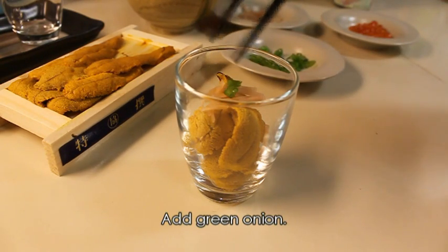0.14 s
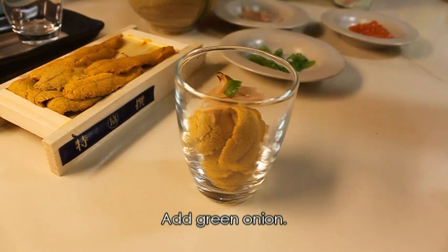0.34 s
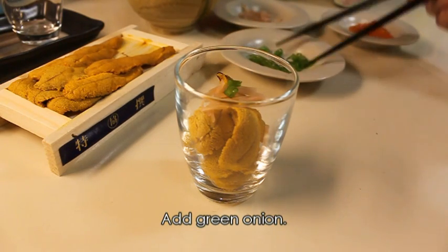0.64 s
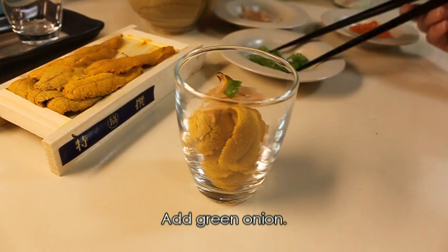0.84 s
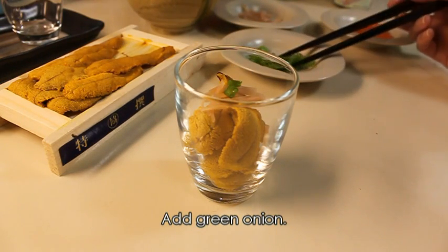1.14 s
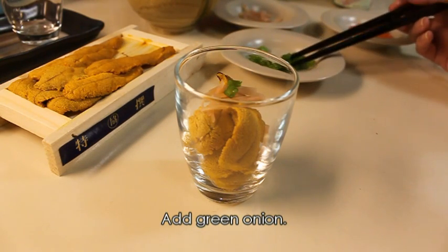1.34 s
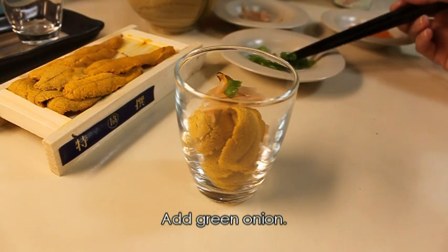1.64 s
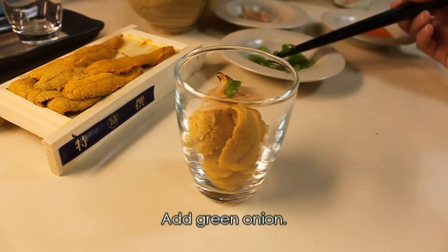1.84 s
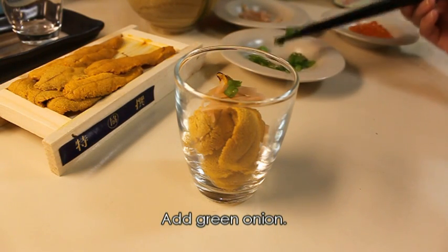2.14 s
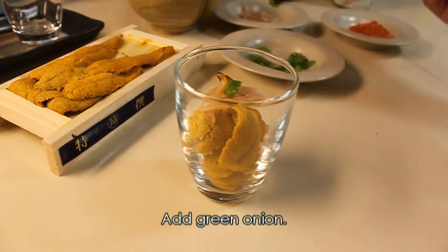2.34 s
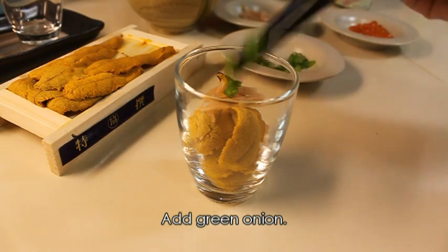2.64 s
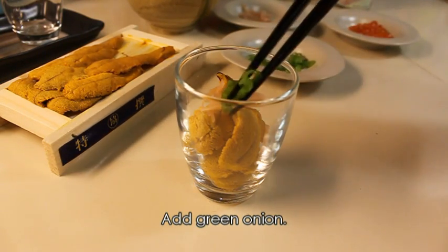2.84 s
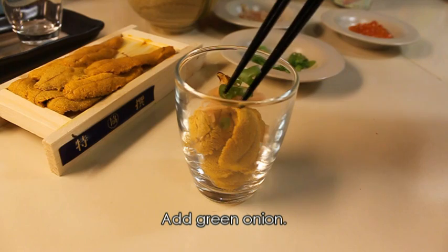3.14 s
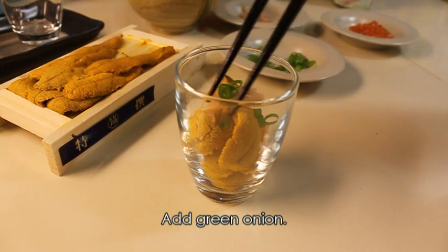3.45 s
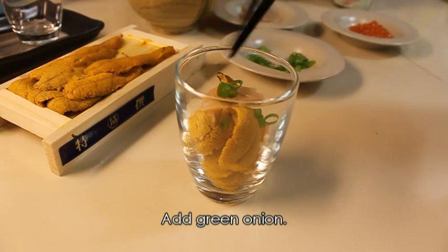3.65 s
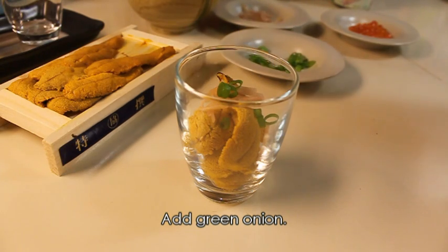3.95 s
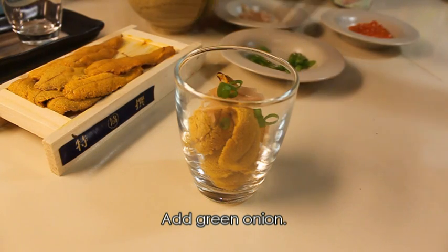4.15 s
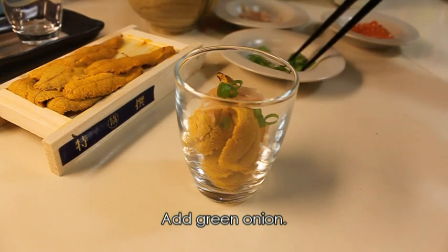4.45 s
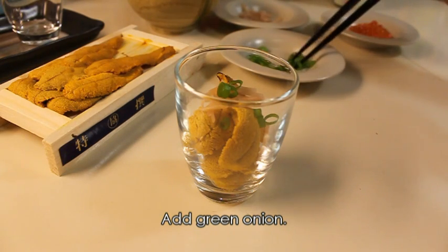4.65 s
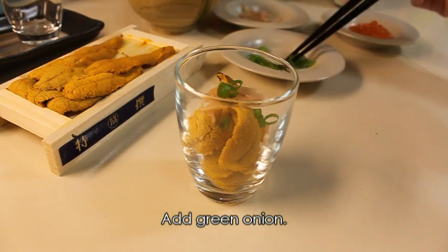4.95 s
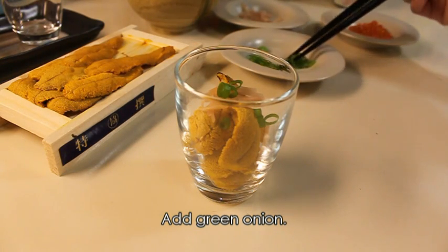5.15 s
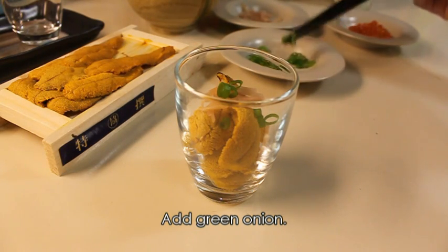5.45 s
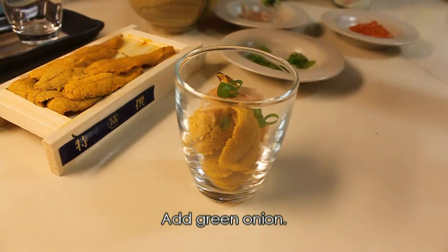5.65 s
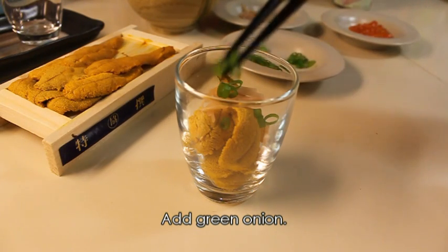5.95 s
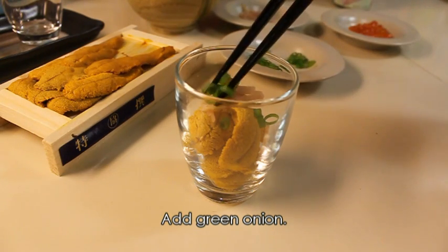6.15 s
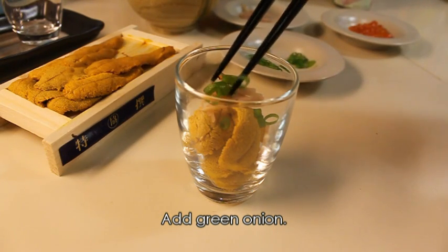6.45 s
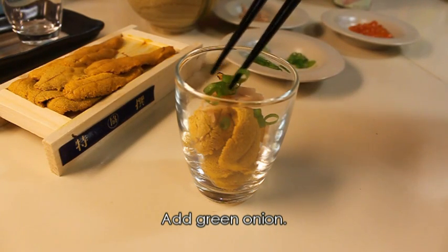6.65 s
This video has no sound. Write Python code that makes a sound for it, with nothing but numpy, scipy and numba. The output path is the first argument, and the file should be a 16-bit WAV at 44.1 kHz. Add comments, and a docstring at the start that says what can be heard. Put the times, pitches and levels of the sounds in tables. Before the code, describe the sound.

A refrigerator hums steadily with a thin high whine in a hard-walled kitchen. Close to the microphone, chopsticks click lightly on a small ceramic plate and scrape softly through chopped green onion. They tick once against a glass, then tap the plate more firmly. Further off, a dish is set down and crockery clashes loudly with a quick rattle, after which the hum dips and creeps back.

```python
"""Chopsticks in a kitchen

A refrigerator hums and whines in a hard-walled kitchen; further off, crockery is set down, then clashes
and rattles. Nearby, chopsticks pick green onion off a small ceramic plate, tap the plate and tick against
a glass. Each impact gives a brief click and excites the damped modes of the vessel struck.
An automatic gain control ducks after the clash and creeps back."""
import sys
import numpy as np
from scipy import signal
from scipy.fft import rfft, irfft, next_fast_len
from scipy.io import wavfile
from scipy.ndimage import uniform_filter1d, map_coordinates
from numba import njit

SR = 44100
rng = np.random.default_rng(int(sys.argv[2]) if len(sys.argv) > 2 else 0)


def transcribe(signal):
    """Save signal, clipped to [-1, 1], as a 16-bit WAV file at the path in sys.argv[1]."""
    frames = np.atleast_2d(signal).T
    limited = np.clip(frames, -1, 1)
    pcm = np.round(limited * 32767).astype(np.int16)
    wavfile.write(sys.argv[1], SR, pcm)


N = 299439

# chopstick taps on the plate: t/s, relative level/dB, relative push on the counter/dB, pitch ratio
PLATE_TAPS = [(.865, -25.5, -29, 1.05), (1.0096, -27, -27, .93), (1.191, -39, -38, 0.97),
              (4.4197, -18, -18.5, 0.99), (4.484, -32.5, -38, 1), (4.5734, -18.5, -19, 1.03)]


def amp(db):
    """Amplitude ratio of a level in decibels."""
    return 10 ** (np.asarray(db) / 20)


def unit(x):
    """Normalisation to an rms of 1."""
    return x / np.sqrt(np.mean(x ** 2) + 1e-20)


def along(points, hz):
    """Interpolation of (f/Hz, value) points on a logarithmic frequency axis."""
    f, v = np.transpose(points)
    return np.interp(np.log(hz + 1), np.log(f + 1), v)


def wobble(rate):
    """Random modulation: a smooth curve through `rate` Gaussian values a second."""
    knots = rng.standard_normal(int(N * rate / SR) + 4)
    return map_coordinates(knots, [np.arange(N) * rate / SR])


def filtered(x, response):
    """Linear filtering: the spectrum of x times a frequency response."""
    size = next_fast_len(len(x) + SR // 10)
    return irfft(rfft(x, size) * response(np.fft.rfftfreq(size, 1 / SR)), size)[:len(x)]


def shaped(x, spectrum):
    """Spectral shaping of x by (f/Hz, level/dB) points, at unit rms."""
    return unit(filtered(x, lambda f: amp(along(spectrum, f))))


def add(track, s, sound):
    """Superposition of a sound on the track at s seconds."""
    part = track[round(s * SR):][:len(sound)]
    part += sound[:len(part)]


def ring(modes, t, scatter_db):
    """Free vibration: exponentially damped modes, with new strengths and phases at each blow."""
    return sum(amp(db + scatter_db * rng.normal() - 60 * t / t60)
               * np.sin(2 * np.pi * (hz * t + rng.random())) for hz, db, t60 in modes)


def room(x, wet_db):
    """Reverberation: direct sound plus the kitchen's diffuse tail, whose top treble dies first."""
    # reverberation time: f/Hz, T60/s
    decay_times = [(300, 0.23), (1500, 0.44), (4000, 0.32), (8000, 0.33), (15000, 0.2)]
    hz, t, spectra = signal.stft(rng.standard_normal(SR // 2), SR, nperseg=256)
    decay = amp(-60 * t / along(decay_times, hz)[:, None])
    tail = signal.istft(spectra * decay, SR, nperseg=256)[1]
    return x + amp(wet_db) * signal.fftconvolve(x, tail / np.linalg.norm(tail))[:len(x)]


def refrigerator_hum(shaft_hz=58.57, buzz_hz=119.97, buzz_db=-60.5, waver_db=1.16, drift_rad=0.21):
    """Forced vibration: the shaft slips just behind the mains; the iron buzzes at twice the mains rate."""
    # compressor tones: multiple of the shaft rate, level/dB
    shaft_orders = [(1, -59), (6, -43), (7, -54), (8, -62)]
    # fan tones, the lowest two beating: f/Hz, level/dB
    fan_tones = [(445.6, -63), (449.3, -59), (772.5, -66), (940.7, -63)]
    shaft = [(order * shaft_hz, db) for order, db in shaft_orders]
    overtones = [(k * buzz_hz, buzz_db - 6.5 * np.log2(k / 6)) for k in range(6, 14)]  # -6.5 dB/octave
    hum, t = np.zeros(N), np.arange(N) / SR
    for hz, db in shaft + [(buzz_hz, buzz_db)] + overtones + fan_tones:
        amplitude = np.sqrt(2) * amp(db + waver_db * wobble(5.5))
        phase = 2 * np.pi * (hz * t + rng.random()) + drift_rad * wobble(1.8)
        hum += amplitude * np.sin(phase)
    return hum


def refrigerator_air(level_db=-46):
    """Broadband flow noise: air moved by the fan."""
    # spectrum of the air: f/Hz, relative level/dB
    spectrum = [(20, -17), (40, -9), (80, -8), (110, -1), (195, -0.5), (250, -4), (330, 3.5), (550, 0.5),
                (950, -4), (2000, -11), (3500, -14), (5500, -19), (10000, -27), (15800, -29)]
    return amp(level_db) * shaped(rng.standard_normal(N), spectrum)


def refrigerator_whine(waver_db=0.5):
    """Narrow-band noise: the machine whines in thin bands, each wavering in level."""
    # bands of whine: f/Hz, half-width/Hz, level/dB
    bands = [(2768, 17, -67), (3630, 150, -62.5), (4400, 10, -74), (4776, 5.5, -70), (6007, 44, -66.5),
             (6430, 4.5, -68), (8145, 170, -66.5), (9190, 49, -71), (9520, 40, -73.5), (10580, 60, -78),
             (11930, 120, -73.5)]
    whine = np.zeros(N)
    for hz, width, db in bands:
        band = filtered(rng.standard_normal(N), lambda f: 1 / (1 + ((f - hz) / width) ** 2))
        whine += unit(band) * amp(db + waver_db * wobble(2.84))
    return whine


def crockery(contacts, modes, spectrum, level_db, ring_db, crack_t60, rise_s, wet_db):
    """Impacts in the reverberant field: each cracks and rings the dishes, low-passed at its own cut-off."""
    out, t = np.zeros(N), np.arange(SR * 2 // 3) / SR
    for s, db, cutoff_hz in contacts:
        crack = shaped(rng.standard_normal(len(t)), spectrum) * amp(-60 * t / crack_t60)
        tone = amp(ring_db) * ring(modes, t, scatter_db=4.0)
        hit = (crack + tone) * (1 - np.exp(-t / rise_s))
        hit = filtered(hit, lambda f: 1 / (1 + .5j * f / cutoff_hz) ** 2)
        add(out, s, amp(db + level_db) * room(hit, wet_db))
    return out


def dish_set_down():
    """Damped impact: a dish meets a counter across the room, thuds and rings briefly."""
    # contacts: t/s, relative level/dB, cut-off f/Hz
    knocks = [(5.367, -22, 9000), (5.373, -13.5, 7000), (5.385, -16.5, 3500), (5.407, -16.5, 5000),
              (5.482, -21, 7000), (5.503, -23.5, 2200)]
    # modes of the dish: f/Hz, relative level/dB, T60/s
    modes = [(1104, -3, .15), (1414, -2, 0.13), (1454, -2, 0.11), (1700, -15, .2), (2810, 5.5, 0.073),
             (3510, 4.5, 0.11), (3820, 1, 0.11), (6400, -8, .15), (7300, -3, 0.14)]
    # spectrum of dish against counter: f/Hz, relative level/dB
    thud_spectrum = [(150, -33), (350, -3), (600, -9), (850, -1), (1150, -0.5), (2100, -1), (3000, -3),
                     (4200, -1.5), (5200, -5), (7200, -7.5), (8500, -14), (15800, -14)]
    return crockery(knocks, modes, thud_spectrum, level_db=-4, ring_db=-22.5,
                    crack_t60=0.042, rise_s=0.002, wet_db=3.0)


def crockery_clash(graze_lead_s=0.003, graze_db=-10.5, flight_s=0.0145, restitution=0.9, loss_db=2.5):
    """Inelastic bouncing: after a graze, each clash rattles on in ever quicker, weaker contacts."""
    # clashes: t/s, relative level/dB, cut-off f/Hz
    clashes = [(5.659, -1.5, 15500), (5.723, -6, 15500)]
    # modes of the crockery: f/Hz, relative level/dB, T60/s
    modes = [(845, -9, .25), (1105, -7, .2), (1395, -8, .2), (1493, -8, .2), (1738, -8, .25),
             (2812, -3, .22), (2862, -3, .22), (2962, -1, .3), (3514, -4, .2), (3752, 1, .25),
             (3869, -2, .2), (3932, -1, .25), (4084, -2, .2), (4122, 0, .3), (4322, -2, .3), (4673, -2, .2),
             (4803, 1, .28), (5428, -2, .3), (6433, -9, .25), (6631, -6, .3), (6945, -3, .25),
             (8273, -8, .25), (8958, -8, .22), (11250, -7, .22), (12260, -7, .22), (12910, -8, .2)]
    # spectrum of the contact: f/Hz, relative level/dB
    crack_spectrum = [(200, -28), (500, -14), (850, -5.5), (1500, -8), (2100, -4), (3000, 0.5), (4000, 2),
                      (5200, 3), (6000, -2.5), (7200, -3), (10000, -6), (12700, -1.5), (15800, -11)]
    first_s, first_db, first_hz = clashes[0]
    graze = [(first_s - graze_lead_s, first_db + graze_db, first_hz)]
    delays = np.append(0, np.cumsum(flight_s * restitution ** np.arange(3)))
    rattle = [(s + delay, db - loss_db * k, hz) for s, db, hz in clashes for k, delay in enumerate(delays)]
    return crockery(graze + rattle, modes, crack_spectrum, level_db=-1.5, ring_db=-32.0,
                    crack_t60=0.028, rise_s=0.0018, wet_db=4.5)


def onion(stir_db=-59, half_length_s=0.044, grain_db=1.5):
    """Friction noise: short, grainy scrapes as the tips gather the onion, with a few faint stirs."""
    # pushes through the onion: t/s, level/dB
    pushes = [(0.848, -46.5), (0.922, -47), (1.195, -52), (3.434, -50.5), (3.584, -53), (4.575, -50),
              (4.876, -54), (6.285, -52)]
    # spans of rummaging on the plate: start t/s, end t/s
    rummages = [(0.6, 1.27), (4.2, 4.4)]
    # spectrum of the scrape: f/Hz, relative level/dB
    spectrum = [(400, -20), (1100, 4), (3000, 3), (8000, -3), (15000, -10)]
    t = np.arange(N) / SR
    stirs = [(s, stir_db) for start, end in rummages for s in rng.uniform(start, end, size=2)]
    strokes = [amp(db) * np.exp(-2 * ((t - s) / half_length_s) ** 2) for s, db in pushes + stirs]
    envelope = np.sqrt(sum(stroke ** 2 for stroke in strokes))  # incoherent sounds add in power
    grains = rng.standard_normal(N) * amp(grain_db * wobble(500))
    return envelope * shaped(grains, spectrum)


def counter(level_db=-18, t60=0.15, rise_s=0.00099):
    """Force transmission: each tap pushes the plate against the counter, giving a short, dull knock."""
    # spectrum of the knock: f/Hz, relative level/dB
    spectrum = [(80, -20), (200, 1), (350, -18), (650, -2), (900, 6), (1150, 4.5), (1500, -22), (2300, -5),
                (5000, -26)]
    out, t = np.zeros(N), np.arange(SR // 4) / SR
    for s, _, db, _ in PLATE_TAPS:
        envelope = amp(db + level_db - 60 * t / t60) * (1 - np.exp(-t / rise_s))
        add(out, s, envelope * shaped(rng.standard_normal(len(t)), spectrum))
    return out


def chopsticks(contacts, modes, level_db, snap_db, click_db, click_t60, scatter_db, scatter_t60, wet_db):
    """Impulse excitation: a hard tip snaps and rings a vessel; nearby surfaces scatter the click."""
    out, t = np.zeros(N), np.arange(SR // 3) / SR
    tip_band = signal.butter(2, [1000, 13500], "band", fs=SR, output="sos")
    for s, db, tilt_db_per_octave, pitch in contacts:
        envelope = amp(click_db - 60 * t / click_t60) + amp(scatter_db - 60 * t / scatter_t60)
        click = envelope * rng.standard_normal(len(t))
        add(click, 0, [amp(snap_db)])  # the instant of contact
        add(click, 0.0029, [amp(snap_db - 9)])  # its first reflection
        tone = ring(modes, pitch * t, scatter_db=1.5)  # the pitch shifts with grip and point of contact
        hit = tone + signal.sosfilt(tip_band, click)
        hit = filtered(hit, lambda f: amp(tilt_db_per_octave * np.log2((f + 500) / 6000)))
        add(out, s, amp(db + level_db) * room(hit, wet_db))
    return out


def glass_tick(start_s=3.624, tick_db=-24.5, tilt_db_per_octave=-3, bounce_s=0.017, loss_db=8):
    """Impact and rebound: a chopstick ticks against the filled glass and bounces once."""
    # modes of the glass: f/Hz, relative level/dB, T60/s
    modes = [(1660, -11, 0.045), (4470, -2, 0.029), (4650, 1, 0.027), (6745, -3, 0.041), (7000, -6, .035),
             (8800, -6, 0.027), (10680, -8, .02)]
    contacts = [(start_s + k * bounce_s, tick_db - k * loss_db, tilt_db_per_octave, 1) for k in range(2)]
    return chopsticks(contacts, modes, level_db=-10, snap_db=6, click_db=-5, click_t60=0.0045,
                      scatter_db=-12, scatter_t60=0.04, wet_db=-14)


def glaze_slips(slip_s=0.0038, jitter=0.15, fade_db=12):
    """Stick-slip friction: skidding tips give uneven, fading blows (t/s, level/dB, pitch ratio)."""
    # skids over the glaze: t/s, duration/s, relative level of the first slip/dB, pitch ratio
    skids = [(0.835, .018, -30.5, 1.1), (4.545, 0.02, -27.5, 1)]
    slips = []
    for s, length, db, pitch in skids:
        gaps = slip_s * np.exp(jitter * rng.standard_normal(size=12))
        slips += [(s + t, db - fade_db * t / length, pitch) for t in np.cumsum(gaps) - gaps[0] if t < length]
    return slips


def plate_clicks(rebound_s=0.0075, loss_db=11, firm_db=-17):
    """Modal ringing: skids and taps, each tap rebounding once, excite the plate; light ones sound thin."""
    # modes of plate and stick: f/Hz, relative level/dB, T60/s
    modes = [(1094, 3, 0.065), (2235, -0.5, 0.05), (2523, 4.5, 0.045), (3900, 3.5, 0.051),
             (5060, -5, 0.047), (5320, -8, .035), (5870, -2, 0.086), (6800, -2, 0.052), (7700, 2, 0.038),
             (8500, -6, 0.032), (9600, -2, .035), (10260, -4, .04), (12200, -14, 0.032), (13300, -17, .035)]
    taps = [(s + k * rebound_s, db - k * loss_db, pitch) for s, db, _, pitch in PLATE_TAPS for k in range(2)]
    # a firm tap tilts up by 1.1 dB/octave; each decibel lighter adds 0.13 dB/octave
    contacts = [(s, db, 1.1 + 0.13 * (firm_db - db), pitch) for s, db, pitch in taps + glaze_slips()]
    return chopsticks(contacts, modes, level_db=-20, snap_db=22, click_db=11, click_t60=0.0054,
                      scatter_db=0.5, scatter_t60=0.094, wet_db=-12)


def scene():
    """Superposition: all sources add in one channel."""
    impacts = plate_clicks() + glass_tick() + dish_set_down() + crockery_clash()
    refrigerator = refrigerator_hum() + refrigerator_air() + refrigerator_whine()
    return (impacts + refrigerator + counter() + onion())[None]


@njit
def held(need, hold, release):
    """Peak detection: follow rises at once, wait `hold` samples, then fall by `release` per sample."""
    out, level, wait = np.zeros(len(need)), 0.0, 0.0
    for i in range(len(need)):
        if need[i] > level:
            level, wait = need[i], hold
        elif wait > 0:
            wait -= 1
        else:
            level = max(level - release, 0.0)
        out[i] = level
    return out


def record(dry, threshold_db=-22, hold_s=0.11, release_db_per_s=14, attack_s=0.013, top_hz=15900):
    """Automatic gain control: loud sound is turned down and the gain recovers slowly; then a band limit."""
    x = dry[0]
    level_db = 10 * np.log10(np.abs(uniform_filter1d(x ** 2, size=512)) + 1e-12)
    excess_db = np.maximum(level_db - threshold_db, 0)
    cut_db = held(excess_db, hold_s * SR, release_db_per_s / SR)
    step = 1 / (attack_s * SR)
    cut_db = signal.lfilter([step], [1, step - 1], cut_db)  # one-pole smoothing
    return filtered(x * amp(-cut_db), lambda f: f < top_hz)[None]


dry = scene()
out = record(dry)
transcribe(out)
```